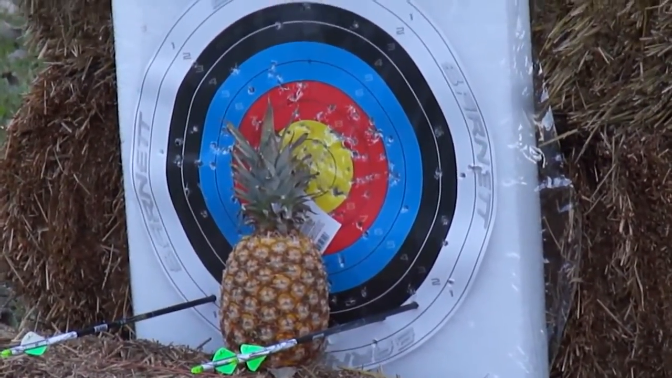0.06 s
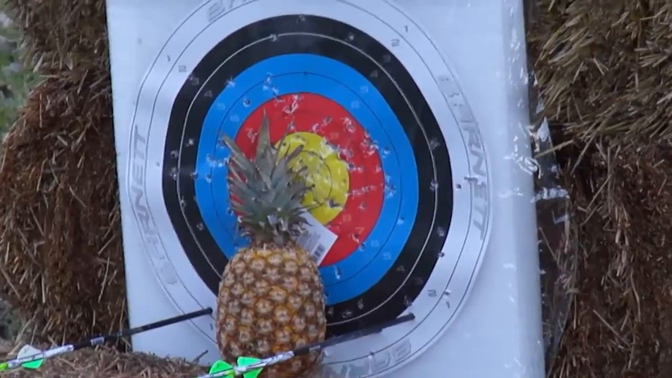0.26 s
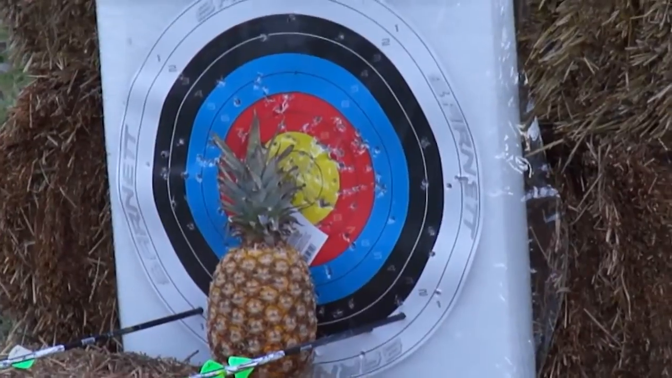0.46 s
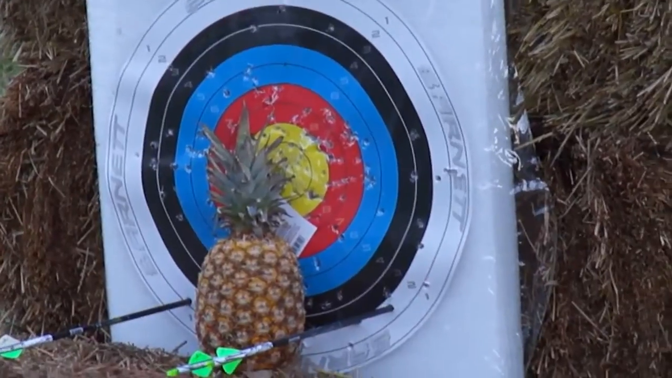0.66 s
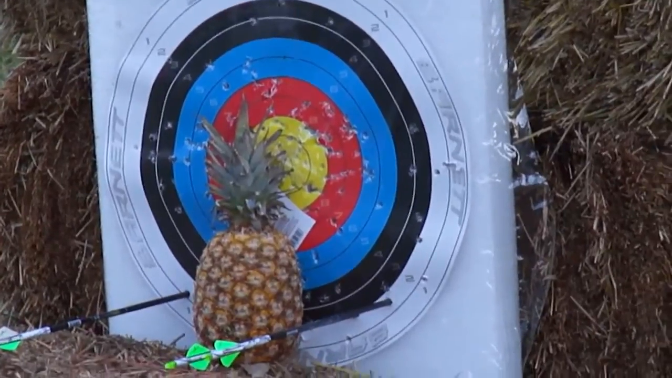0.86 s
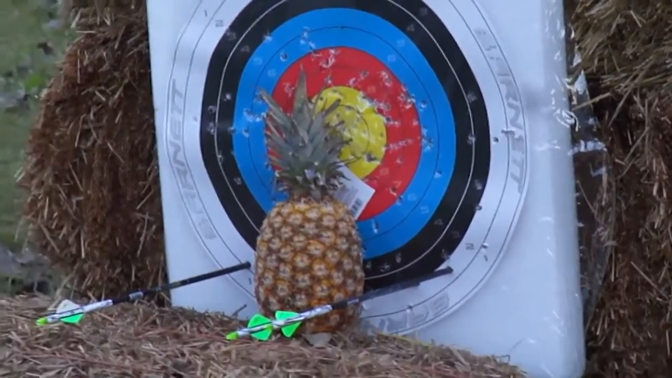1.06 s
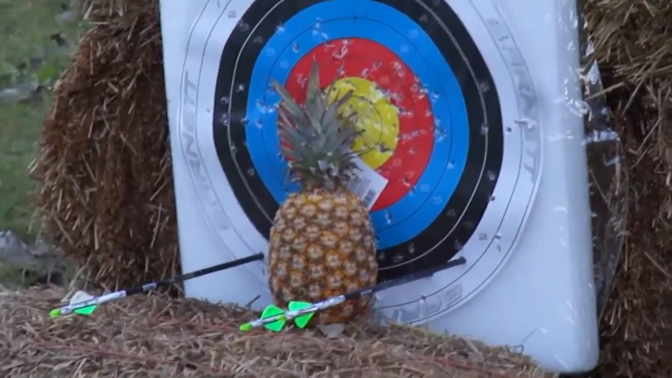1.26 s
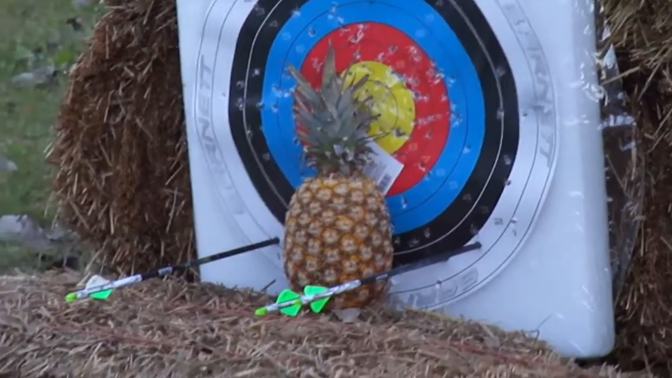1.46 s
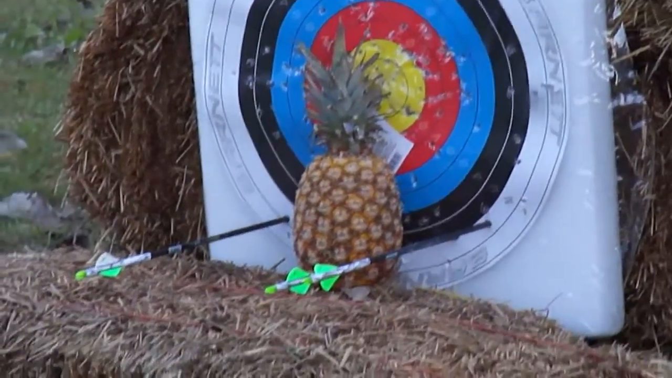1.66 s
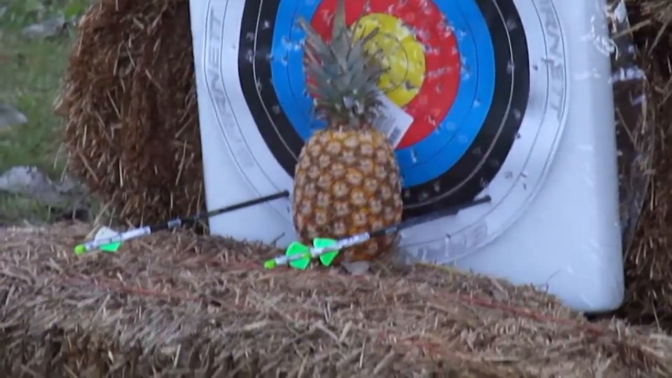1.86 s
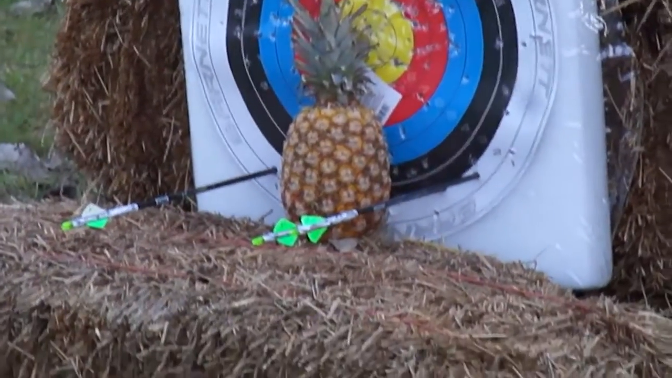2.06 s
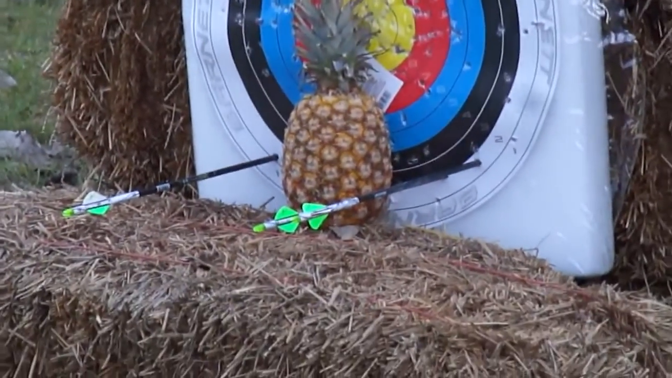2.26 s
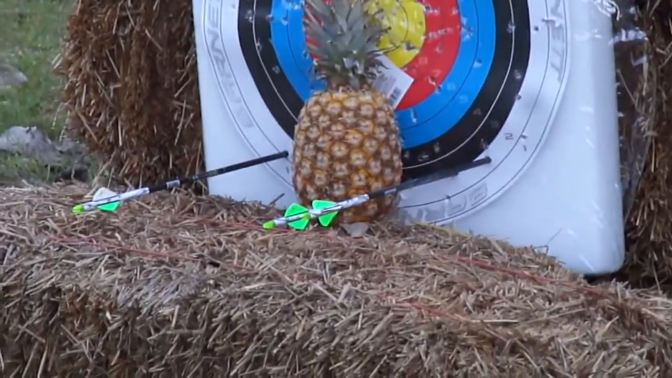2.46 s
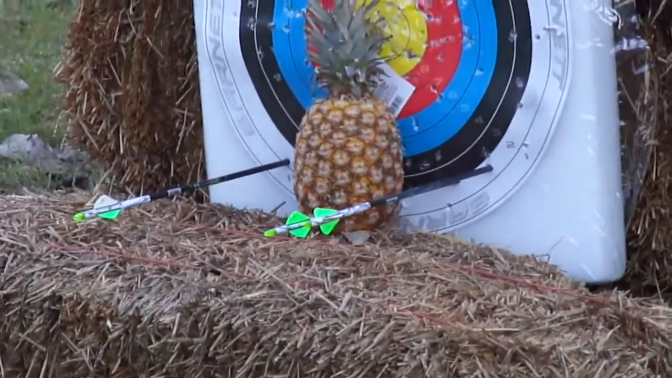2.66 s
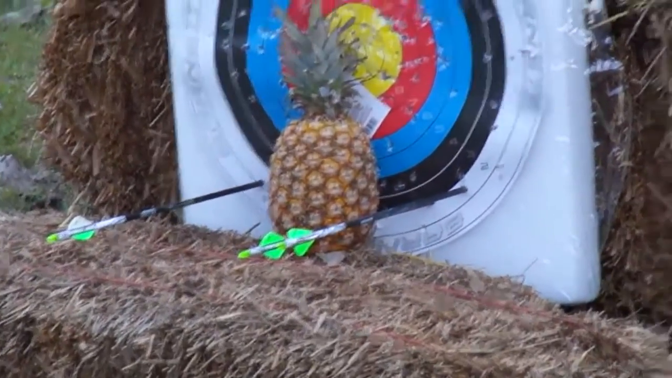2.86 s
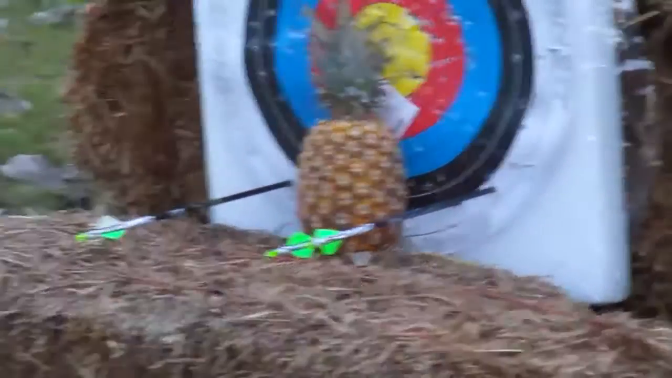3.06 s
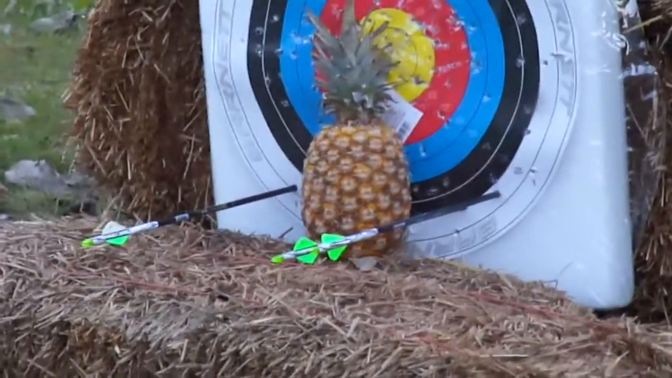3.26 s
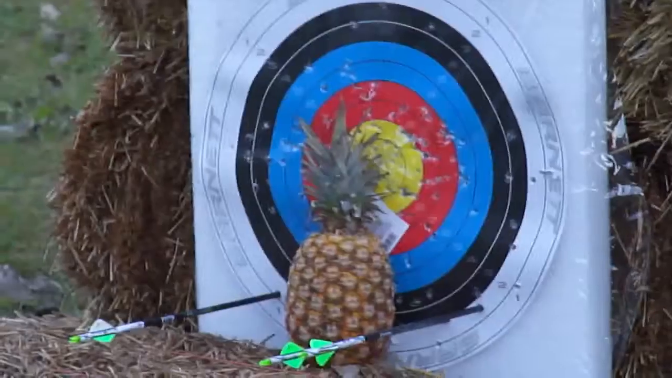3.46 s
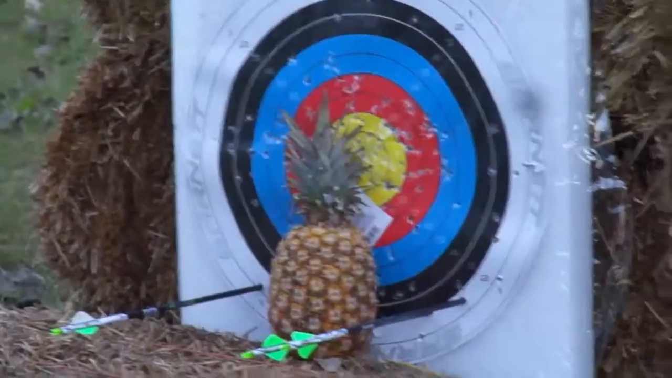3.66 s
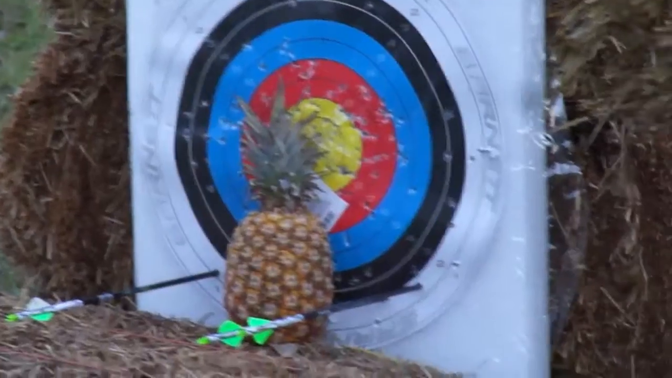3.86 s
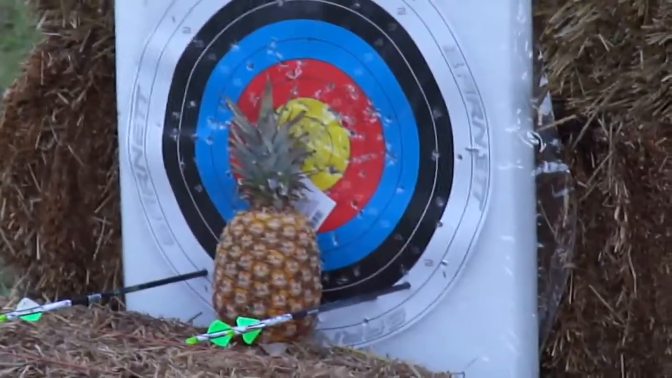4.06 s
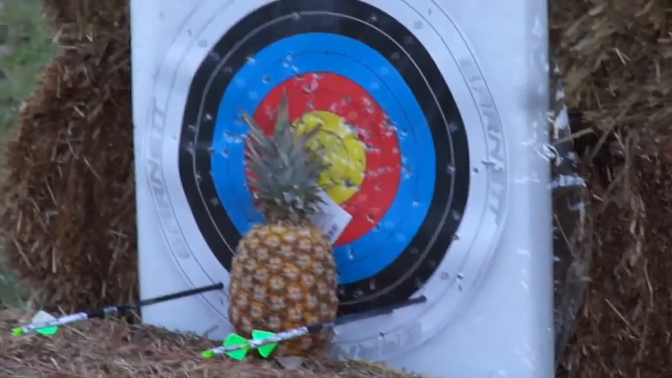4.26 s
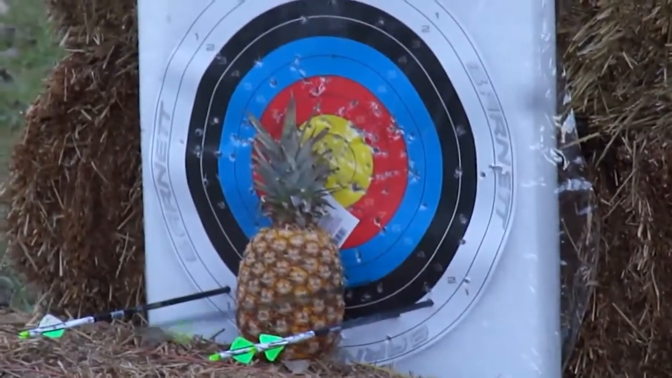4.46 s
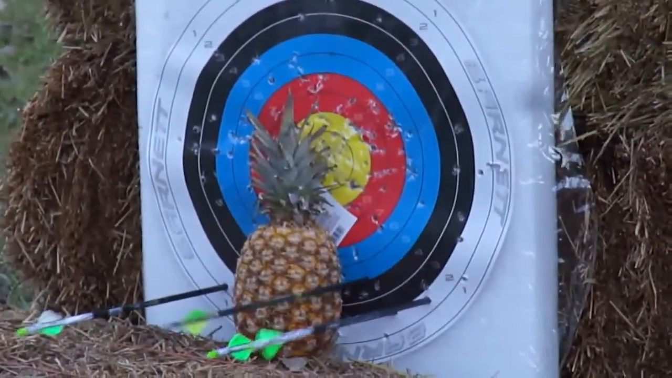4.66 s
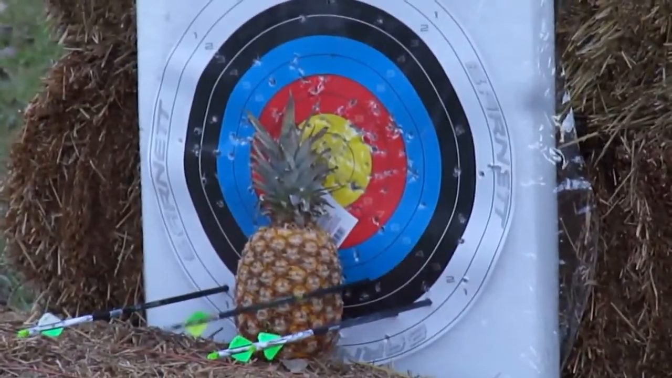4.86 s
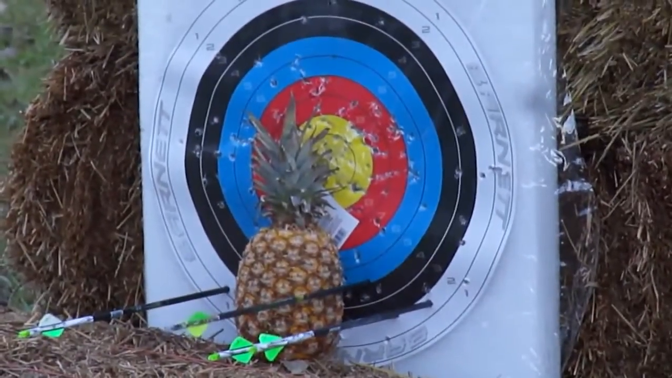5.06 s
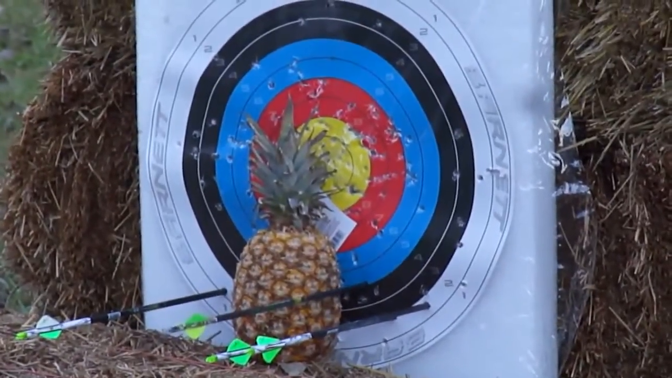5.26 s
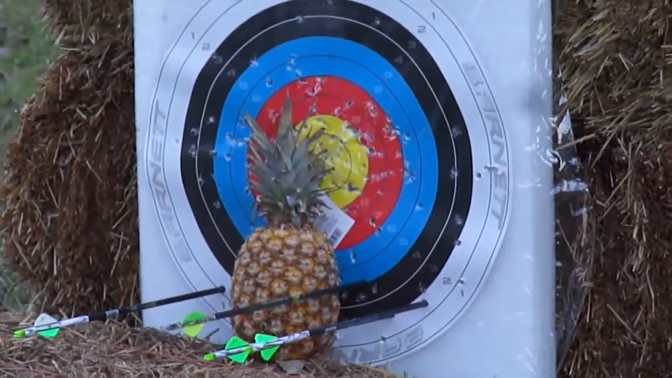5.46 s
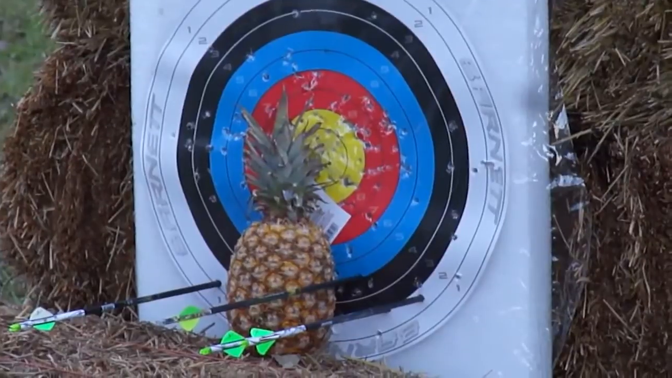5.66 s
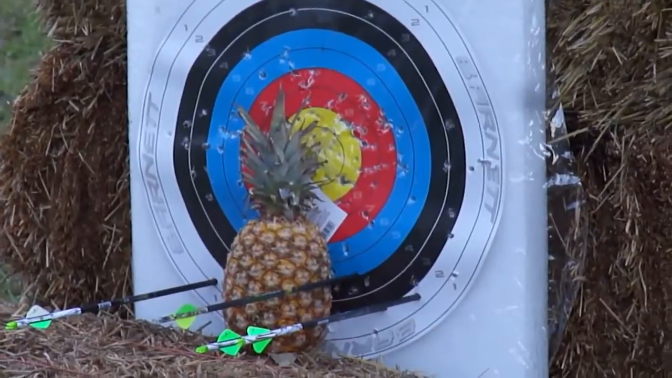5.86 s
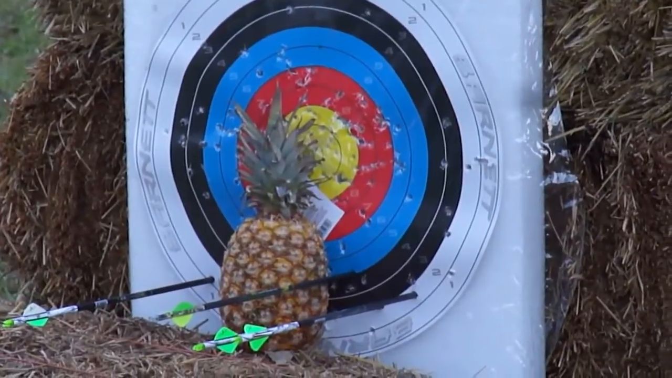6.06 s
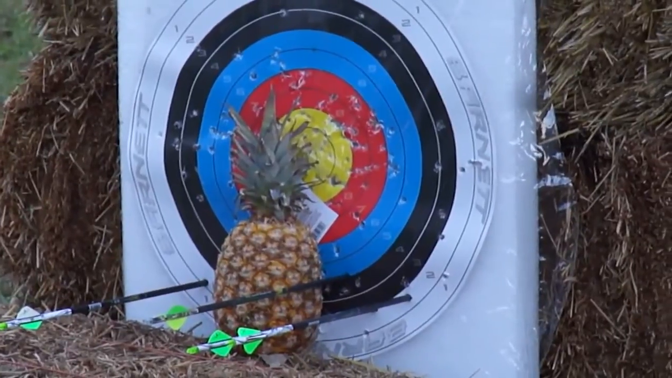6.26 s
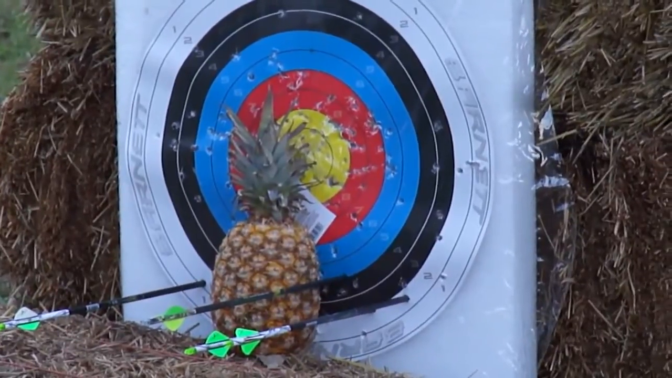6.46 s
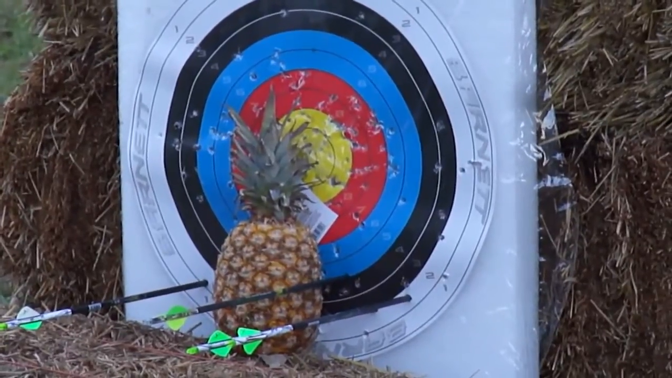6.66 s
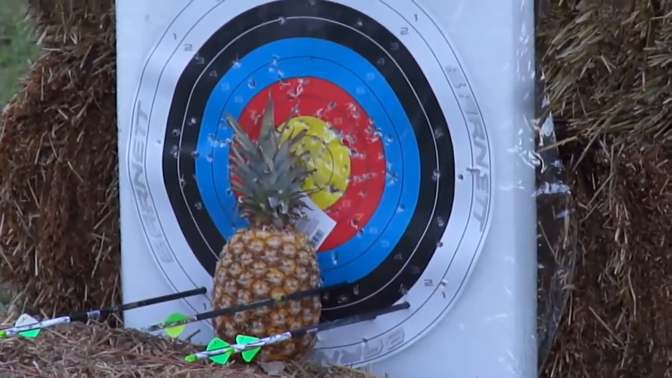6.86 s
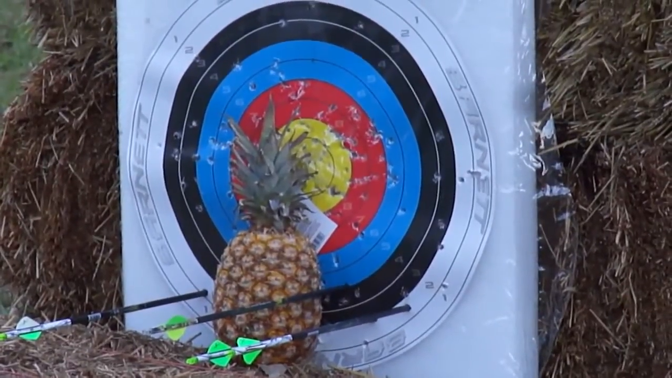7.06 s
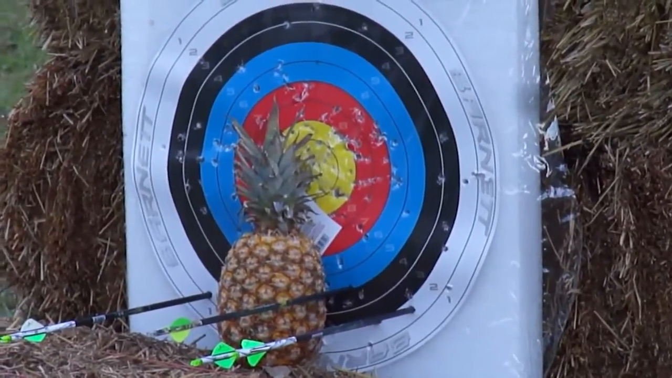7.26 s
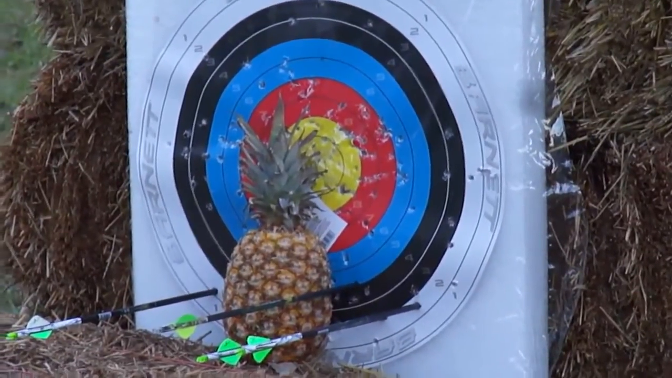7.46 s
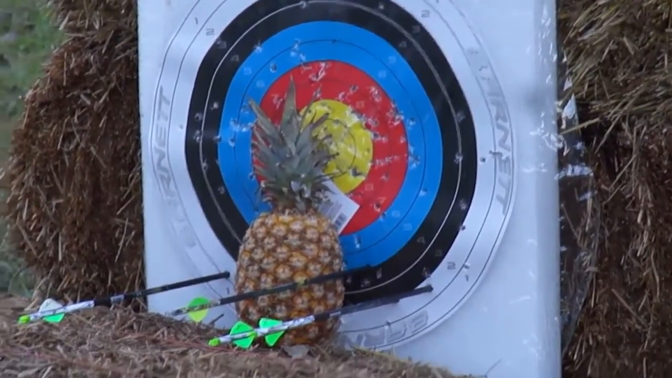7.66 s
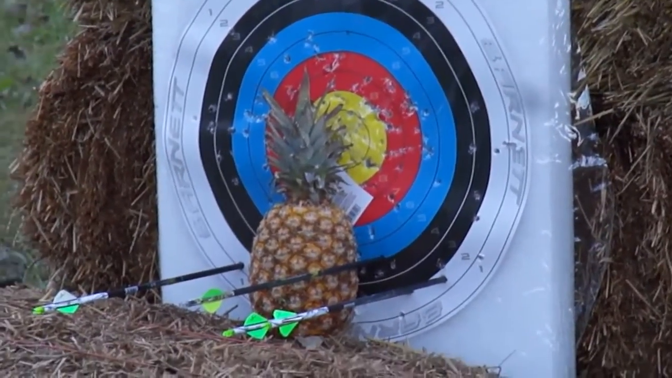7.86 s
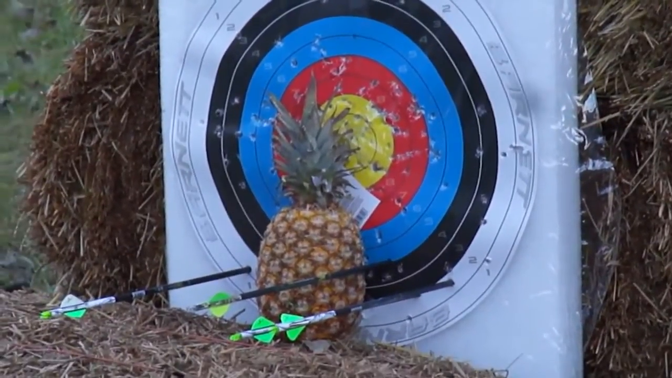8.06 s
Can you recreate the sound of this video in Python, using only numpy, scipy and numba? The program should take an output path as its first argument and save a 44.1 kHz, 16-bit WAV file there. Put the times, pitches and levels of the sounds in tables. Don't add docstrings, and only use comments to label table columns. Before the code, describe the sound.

Dry clicks of a bow being readied over quiet crickets and far traffic, then a sharp release, rattle and hard arrow smack with a fading wash.

```python
import sys
import numpy as np
from scipy import signal
from scipy.io import wavfile
from scipy.ndimage import uniform_filter1d
from numba import njit

SR = 44100
rng = np.random.default_rng(int(sys.argv[2]) if len(sys.argv) > 2 else 0)


def to_wav(s):
    ch = np.atleast_2d(s).T
    pcm = np.round(np.clip(ch, -1, 1) * 32767)
    wavfile.write(sys.argv[1], SR, pcm.astype(np.int16))


def makeup_ratio(level_db):
    decades = np.asarray(level_db, float) / 20
    return 10 ** decades


N = 358091
T = np.arange(N) / SR

# start_s, end_s
GAPS = [
    (.940, .9915),
    (3.418, 3.4605),
]
# start_s, peak_db, snap_hz, snap_t60_s, foam_db
HIT = [
    (4.5686, 4.5, 2380, 0.005, -13.5),
    (4.5711, -18, 2700, .007, 2),
    (4.5995, -27, 2500, .02, -12),
    (4.6115, -26, 1950, .008, -10),
    (4.7655, -33.5, 850, 0.04, 3),
    (6.165, -33.5, 1164, 0.055, -8),
]


@njit
def svf(x, hz, width):
    y, band, low = np.empty(len(x)), 0., 0.
    g, k = np.tan(np.pi * hz / SR), width / hz
    for i in range(len(x)):
        v = (band + g * (x[i] - low)) / (1 + g * (g + k))
        band, low, y[i] = 2 * v - band, low + 2 * g * v, k * v
    return y


def unit(x):
    return x / np.sqrt(np.mean(x ** 2))


def walk(rate, size=N):
    hold = int(SR / rate)
    steps = np.repeat(rng.standard_normal(size // hold + 2), hold)
    return 1.3 * uniform_filter1d(uniform_filter1d(steps, hold), hold)[:size]


def window(start, end, edge):
    return np.clip(np.minimum(T - start, end - T) / edge, 0, 1)


def course(rows):
    s, db = np.transpose(rows)
    return window(s[0] - .002, s[-1] + .002, .003) * makeup_ratio(np.interp(T, s, db))


def swell(s, db, rise_s, t60):
    t = T - s
    decay = makeup_ratio(db - 60 * np.clip(t - rise_s, 0, 9) / t60)
    return decay * np.clip(t / rise_s, 0, 1) ** 1.3


def placed(x, start):
    out, a = np.zeros(N), int(start * SR)
    out[a:a + len(x)] = x[:N - a]
    return out


def resonate(x, peaks):
    out = 0
    for hz, width, db in peaks:
        hz, width = 1. * hz, 1.58 * width
        out = out + makeup_ratio(db) * unit(svf(svf(x, hz, width), hz, width))
    return unit(out)


def traffic():
    # band_hz, level_db per Hz
    spectra = [
        [(15, -67), (25, -37), (43, -18), (114, -10.5), (136, -3.5), (167, -2.5), (190, -7.5), (370, -8), (650, -1.5), (798, -3.5), (2660, -16.5), (3720, -15), (4340, -18.5), (10400, -26.5), (11500, -42), (15000, -72), (22000, -120)],
        [(15, -57), (25, -24), (57, -12), (75, -4), (163, 1), (233, -6.5), (258, -2), (379, -4), (410, -5.5), (840, 1), (3030, -17.5), (4120, -17), (5330, -21), (10600, -26), (11500, -48), (15000, -78), (22000, -120)],
    ]
    # start_s, end_s, pitch_hz, from_db, to_db
    motors = [
        (0, .94, 192, -61.5, -63.5),
        (1.2, 2.4, 193, -66.5, -79),
        (2.5, 3.42, 192, -58, -63),
        (4, 8.2, 194, -65, -62.5),
        (0, 3.42, 145, -68, -68.5),
        (4, 8.7, 231, -59, -68.5),
        (3.46, 7.6, 386, -64.5, -68.5),
        (5, 8.2, 64, -73, -60),
        (3.5, 5.6, 102, -66.5, -64),
    ]
    early = T < GAPS[1][1]
    early_db, late_db = -49, -50.6
    out, surge = 0, walk(0.3)
    for hz in 25 * 2 ** np.arange(0, 9, 1 / 3):
        before, after = (np.interp(np.log(hz), np.log(np.transpose(c)[0]), np.transpose(c)[1])
                         for c in spectra)
        high = np.clip(np.log2(hz / 1500), 0, 1)
        level = (1 - high) * np.where(early, early_db, late_db) + high * (early_db + late_db) / 2
        db = np.where(early, before, after) + 10 * np.log10(hz / 4) + level
        gain = makeup_ratio(db - 27.5 + .5 * surge + walk(6.6))
        out = out + gain * resonate(rng.standard_normal(N), [(hz, hz / 4, 0)])
    for start, end, hz, from_db, to_db in motors:
        rise_hz_per_s = 3.8 if hz < 120 else 0
        pitch = (hz + rise_hz_per_s * (T - start)) * (1 + 0.00574 * walk(3))
        gain = makeup_ratio(np.interp(T, [start, end], [from_db, to_db]) + 3.5 + 2 * walk(4.1))
        out = out + gain * window(start, end, 0.046) * np.sin(2 * np.pi * np.cumsum(pitch) / SR)
    return out


def far_crickets():
    # time_s, level_db
    swells = [
        [(0.0, -58), (0.48, -60), (0.93, -59)],
        [(1.0, -59.5), (1.96, -56), (2.12, -57.5), (2.93, -60), (3.3, -62), (3.41, -56)],
        [(3.47, -53), (3.64, -56.5), (4.36, -58), (4.56, -51), (5.07, -62), (6.03, -56.5), (6.28, -58),
         (7.86, -58.5), (8.12, -54)],
    ]
    # centre_hz, width_hz, level_db
    bands = [
        [(3658, 250, 0)],
        [(3975, 260, 0)],
    ]
    hiss = 0
    for db, band in zip((-3.5, -5.5), bands):
        gain = makeup_ratio(db + 1.7 * walk(30) + 1.5 * walk(3.01))
        hiss = hiss + gain * resonate(rng.standard_normal(N), band)
    return hiss * sum(course(rows) for rows in swells)


def cricket(start, end, hz, rate, db, fall, sounding):
    out, a, b = np.zeros(N), int(start * SR), min(int(end * SR), N)
    cycles = np.cumsum(rate * (1 + 0.0202 * walk(3.7, b - a))) / SR
    stroke = np.clip(cycles % 1 / sounding, 0, 1)
    pitch = hz * (1 + .003 * walk(8, b - a) + .003 * walk(60, b - a) - fall * (stroke - .5))
    tone = np.sin(np.pi * stroke) ** 1.2 * np.sin(2 * np.pi * np.cumsum(pitch) / SR)
    out[a:b] = makeup_ratio(db + 1.4 * walk(40.1, b - a)) * unit(tone)
    return out * window(start, end, 0.025)


def near_crickets():
    # start_s, end_s, pitch_hz, strokes_per_s, level_db
    chirpers = [
        (0, .94, 4350, 31, -62.5),
        (3.46, 6.4, 4200, 32.4, -62.5),
        (5.05, 5.6, 4900, 30, -72),
        (6.2, 7.05, 4900, 26, -70),
        (6.4, 7.2, 4150, 38, -66),
        (7.1, 8.2, 4180, 43, -60.5),
    ]
    # start_s, end_s, pitch_hz, level_db
    trillers = [(0, .3, 3700, -63), (.05, .5, 4480, -66), (3.46, 4.3, 3600, -64), (.75, .94, 3700, -63),
                (1, 1.4, 4490, -65.5), (1.08, 1.2, 3400, -64), (1.2, 1.6, 3640, -65.5),
                (1.3, 1.45, 4100, -66), (1.6, 2.0, 4020, -66), (1.7, 2.18, 3730, -60.5),
                (2.15, 2.55, 4090, -59.5), (2.48, 2.62, 3625, -58.5), (2.65, 3.26, 3650, -64),
                (2.7, 3.1, 3880, -64), (5.6, 6.1, 3700, -64), (5.75, 6.25, 4030, -61),
                (6.45, 7.1, 3580, -63), (6.68, 7.12, 4470, -65), (7.1, 7.5, 3750, -63),
                (7.86, 8.2, 4060, -57)]
    chirps = sum(cricket(*row, fall=.15, sounding=.32) for row in chirpers)
    trills = sum(cricket(start, end, hz, rng.uniform(30, 60), db, fall=.012, sounding=.9)
                 for start, end, hz, db in trillers)
    return chirps + trills


def scatter():
    # start_s, peak_db, rise_s, t60_s
    returns = [
        (4.575, -48, .004, 0.42),
        (4.582, -35, .058, 0.51),
        (4.762, -44, 0.0044, .5),
        (4.74, -46.5, 0.028, 1.9),
    ]
    # start_s, peak_db, rise_s, t60_s
    knock_tail = [
        (0.9913, -47, .002, 0.23),
        (.9915, -50.5, .002, 1.5),
    ]
    # centre_hz, width_hz, level_db
    knock_colour = [(797, 99, -6), (1810, 86, 1.5), (2210, 240, 0.5), (2200, 1400, -8)]
    wash = rng.standard_normal(2 * SR) * makeup_ratio(walk(90, 2 * SR))
    trunks = resonate(wash, [(1930, 680, 2), (2420, 600, 0), (2700, 1500, 1)])
    slope = resonate(wash, [(850, 50, -1.3), (905, 490, -0.44)])
    leaves = resonate(wash, [(5500, 4400, -1), (900, 500, -2)])
    shot = sum(swell(*row) * placed(colour, HIT[0][0])
               for row, colour in zip(returns, (leaves, trunks, slope, trunks)))
    knock = placed(resonate(wash, knock_colour), GAPS[0][0])
    return shot + sum(swell(*row) for row in knock_tail) * knock


def ring(hz, t60):
    t = np.arange(8192) / SR
    return np.sin(2 * np.pi * hz * t) * 1000 ** (-t / max(t60, .002))


def knocks(events, modes, crack_s, crack_hz, spread, scatter_db, rise_s):
    out, t = np.zeros(N + 8192), np.arange(8192) / SR
    for s, db, hz, t60, crack_db, body_db in events:
        centre = np.sqrt(hz * crack_hz)
        crack = resonate(rng.standard_normal(8192), [(centre, spread * centre, 0)]) * np.exp(-t / crack_s)
        body = 0
        for mode_hz, mode_db, mode_t60 in modes:
            loudness, detune = rng.standard_normal(2)
            gain = makeup_ratio(mode_db + scatter_db * loudness) * np.sign(detune)
            body = body + gain * ring(mode_hz * (1 + 0.0094 * detune), mode_t60)
        blow = ring(hz, t60) + makeup_ratio(crack_db) * crack + makeup_ratio(body_db) * body
        a = int(s * SR)
        out[a:a + 8192] += makeup_ratio(db) * blow * (1 - np.exp(-t / rise_s))
    return signal.sosfilt(signal.butter(2, 180, "high", fs=SR, output="sos"), out[:N])


def cracking(events, crack_db):
    return [(s, db, hz, t60, crack_db + 4 * np.log2(hz / 2500), body_db)
            for s, db, hz, t60, body_db in events]


def handling():
    # start_s, peak_db, snap_hz, crack_db, body_db
    clicks = [
        (.6535, -12.5, 3720, -5.5, -13),
        (.6543, -13.5, 1800, -14, -19),
        (0.6878, -9.5, 3240, -10.5, -18),
        (2.8556, -9.5, 3280, -1, -10.5),
        (3.0789, -13, 3050, -19, -6.5),
        (3.1712, -23.5, 3500, -11, -11),
        (3.5943, -23, 1770, -6, -26),
        (3.5955, -16.5, 2560, -5, -17),
    ]
    # start_s, peak_db, snap_hz
    ticks = [(.056, -36.5, 2800), (.072, -41, 2600), (.11, -41, 2500), (.125, -44, 2700), (.14, -44, 2600),
             (.178, -37, 2500), (.207, -33, 2600), (.266, -43, 5770), (.353, -32.5, 2780),
             (.412, -29.5, 3230), (.419, -37, 3000), (.573, -35, 2400), (1.93, -49, 5000),
             (2.05, -48, 5300), (2.15, -50, 5300), (2.44, -48, 4800), (2.53, -42.5, 4900),
             (2.635, -48, 5500), (2.819, -39, 2600), (2.834, -34, 2760), (2.887, -46, 2400),
             (2.912, -43, 2100), (2.965, -39, 1400), (3.101, -41, 4690), (5.219, -42, 3180),
             (5.96, -41.5, 5170), (7.01, -38, 4450), (7.464, -42, 4500), (7.772, -43, 5800),
             (8.037, -43, 3600)]
    # mode_hz, level_db, t60_s
    grip = [(350, -18, 0.013), (565, -4.5, 0.0062), (852, -9.5, 0.05), (1313, -6.5, 0.02),
            (1800, -2, 0.021), (2460, 0.5, 0.016), (3470, -4, 0.014), (4200, -7.5, 0.013),
            (5690, 2, 0.0067), (6850, -13, 0.0042)]
    firm = [(s, db, hz, 13.6 / hz, crack_db, body_db) for s, db, hz, crack_db, body_db in clicks]
    faint = cracking([(s, db, hz, 0.0097, -12.5) for s, db, hz in ticks], crack_db=-1.5)
    return (knocks(firm, grip, crack_s=.0007, crack_hz=6000, spread=1.2, scatter_db=1, rise_s=.0001)
            + knocks(faint, grip, crack_s=0.0013, crack_hz=3400, spread=0.47, scatter_db=6, rise_s=0.0003))


def rattle():
    # time_s, level_db
    shake = [(4.346, -34), (4.357, -36.5), (4.364, -25), (4.372, -33), (4.393, -34), (4.408, -26),
             (4.476, -27), (4.51, -34), (4.566, -35)]
    # level_db at the loose, fade_db_per_s
    layer_mix = [
        (3, 83),
        (0, 1.5),
        (-5, 32),
    ]
    # centre_hz, width_hz, level_db
    hum = [(436, 60, -11), (605, 340, -4), (850, 135, -0.5), (1120, 840, -1.5)]
    buzz = [(2070, 1300, 5), (2630, 270, 0), (3250, 310, 8), (4040, 180, -3), (3000, 2200, 13)]
    fizz = [(5500, 300, 1), (6700, 2900, 8), (8340, 1300, -2), (8900, 2800, -18)]
    size = SR // 2
    since = np.arange(size) / SR
    unevenness = makeup_ratio(1.5 * rng.exponential(size=size)) * makeup_ratio(1.5 * walk(300, size))
    mix = 0
    for (db, fade), peaks in zip(layer_mix, (hum, buzz, fizz)):
        taps = unevenness * rng.standard_normal(size)
        mix = mix + makeup_ratio(db - fade * since) * resonate(taps, peaks)
    return course(shake) * placed(mix, shake[0][0] - .002)


def loose():
    # start_s, peak_db, snap_hz, snap_t60_s, limbs_db
    blows = [
        (4.3407, -14.5, 980, 0.013, -18.5),
        (4.3422, -12, 2420, .012, -17),
        (4.3430, -11.5, 6570, 0.0046, -11),
        (4.3602, -22, 4970, 0.009, -5.5),
        (4.3617, -1, 2050, 0.006, -16),
        (4.3622, -9.5, 940, 0.017, -25),
        (4.3628, -9, 3070, 0.0096, -14),
        (4.3908, -7, 2500, 0.0066, -24),
        (4.3982, -21, 7100, .01, -23),
        (4.4815, -19.5, 8750, 0.0058, -18),
    ]
    # mode_hz, level_db, t60_s
    limbs = [(384.6, -7.5, 0.14), (480, -8.5, 0.04), (843, 1, 0.038), (1320, 2, 0.017),
             (2500, 10.5, 0.0075), (3670, 5, 0.011), (6800, -2.5, 0.007)]
    return knocks(cracking(blows, crack_db=-6), limbs, crack_s=0.00081, crack_hz=6860, spread=1.3,
                  scatter_db=0.5, rise_s=0.00018)


def target():
    # mode_hz, level_db, t60_s
    foam = [(250, -28, 0.063), (318, -25.5, 0.047), (940, -9, 0.0077), (1400, -3.5, 0.0065),
            (2100, -28, 0.01), (4800, -6, .005), (6930, -18, 0.0073)]
    return knocks(cracking(HIT, crack_db=-17.5), foam, crack_s=.0008, crack_hz=12000, spread=1.2,
                  scatter_db=1, rise_s=.0002)


def scene():
    meadow = traffic() + far_crickets() + near_crickets()
    bow = handling() + loose() + rattle()
    return (meadow + scatter() + bow + target())[None]


def band_limit(x):
    return signal.sosfilt(signal.butter(12, 12290, fs=SR, output="sos"), x)


def record(dry):
    top = signal.ellip(8, .05, 45, 11000, fs=SR, output="sos")
    x = signal.sosfilt(signal.butter(2, 35, "high", fs=SR, output="sos"), dry)
    x = np.clip(signal.sosfilt(top, x), -.67, .67)
    x = signal.sosfilt(top, x)
    for start, end in GAPS:
        x = x * (1 - window(start, end, .0005))
    return band_limit(x)


dry = scene()
out = record(dry)
to_wav(out)
```